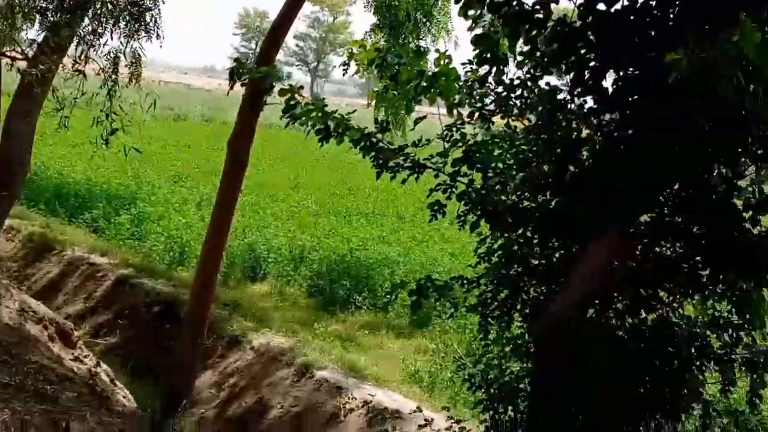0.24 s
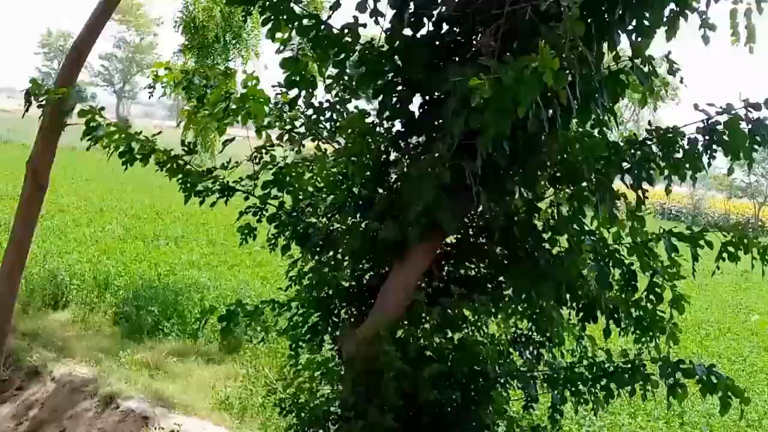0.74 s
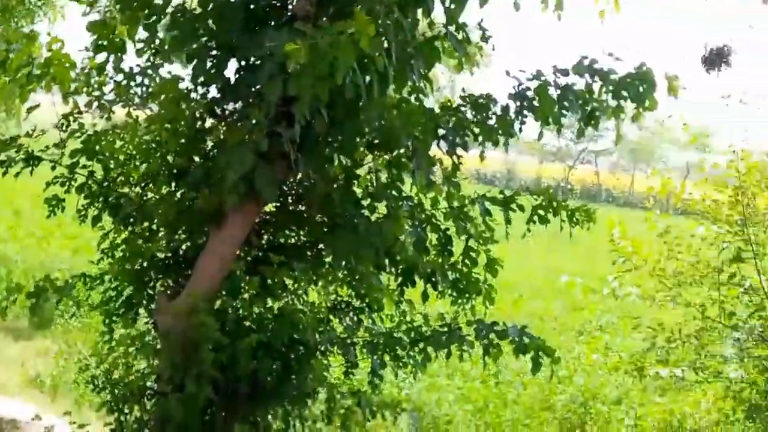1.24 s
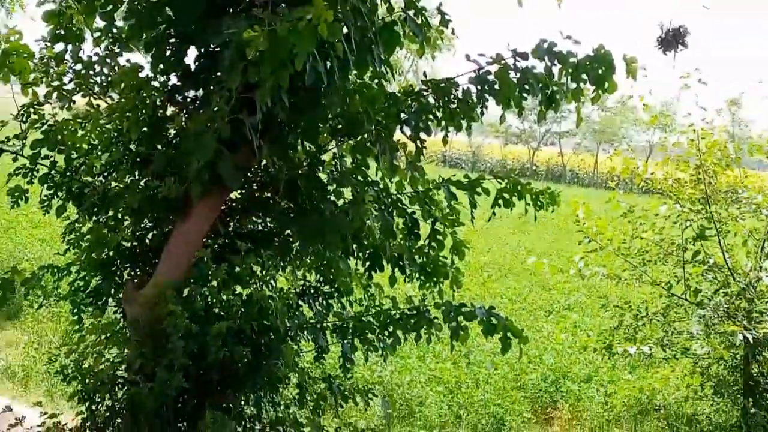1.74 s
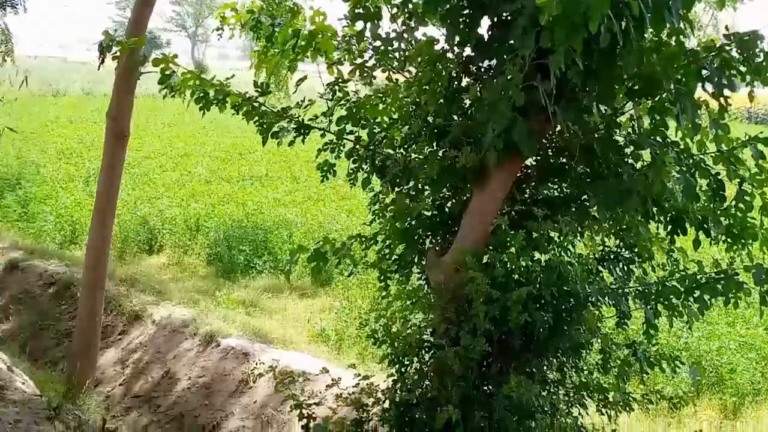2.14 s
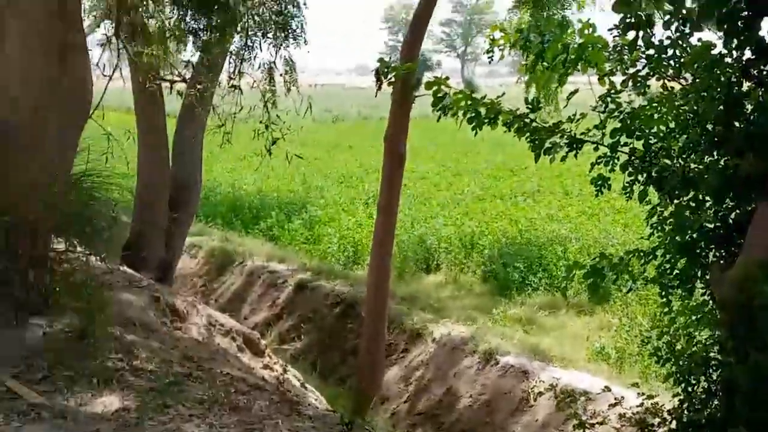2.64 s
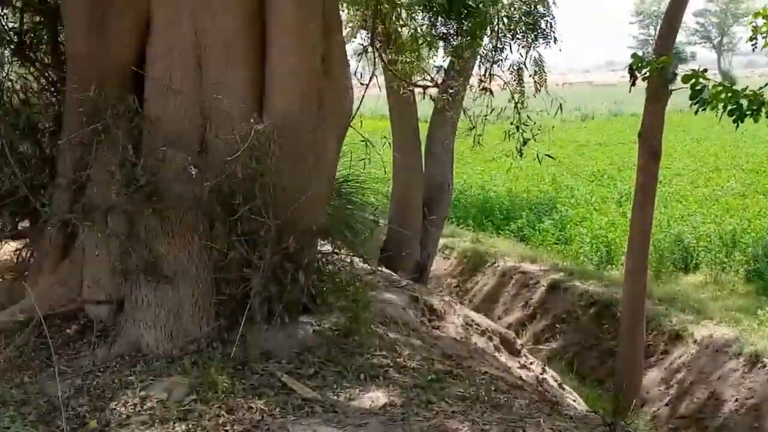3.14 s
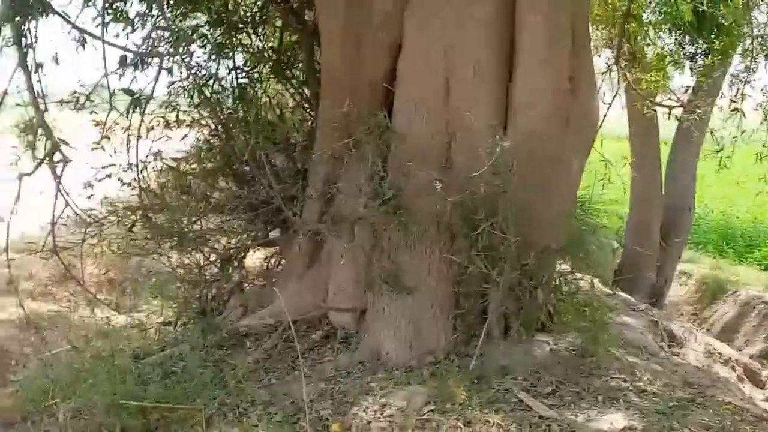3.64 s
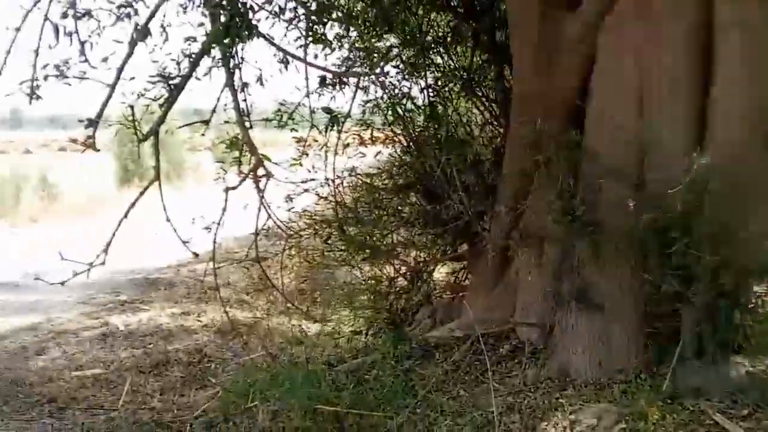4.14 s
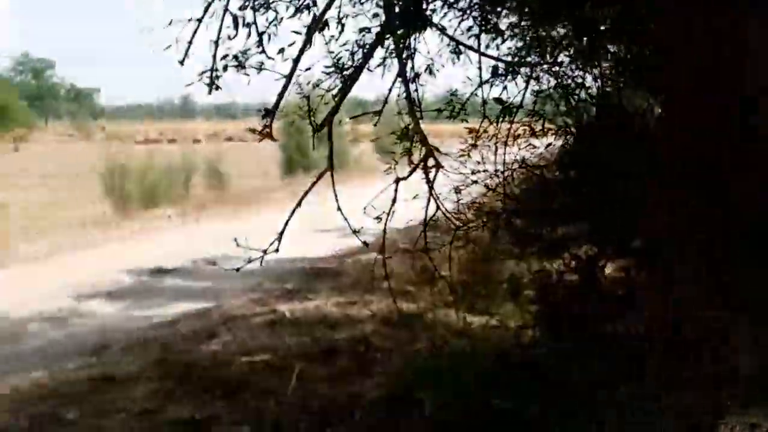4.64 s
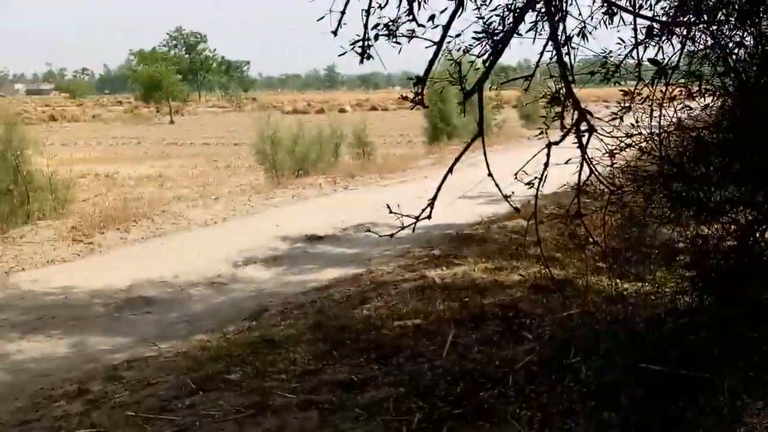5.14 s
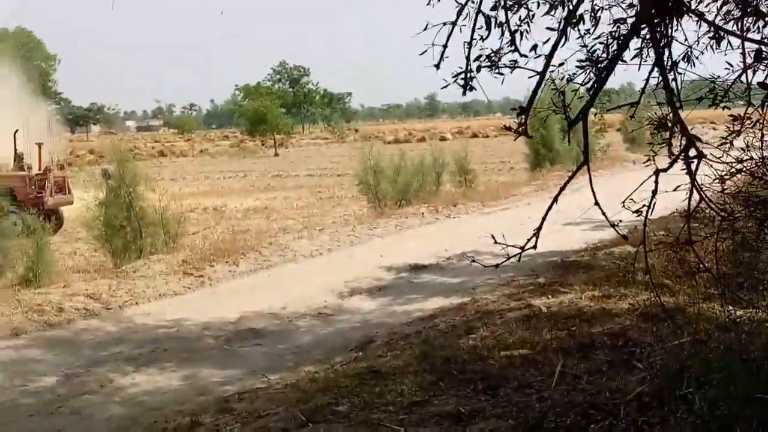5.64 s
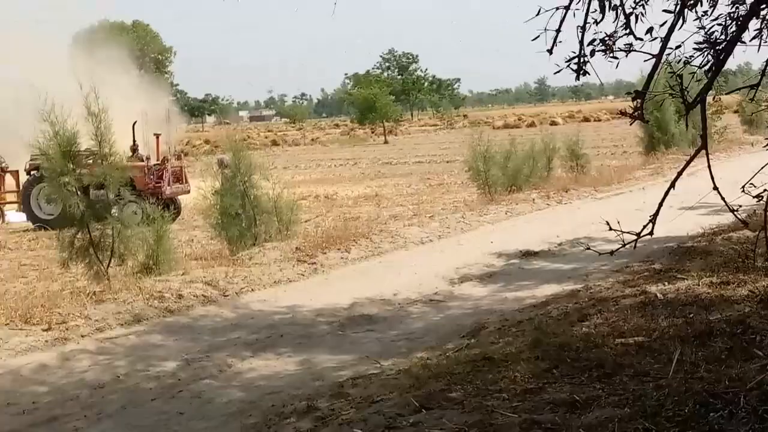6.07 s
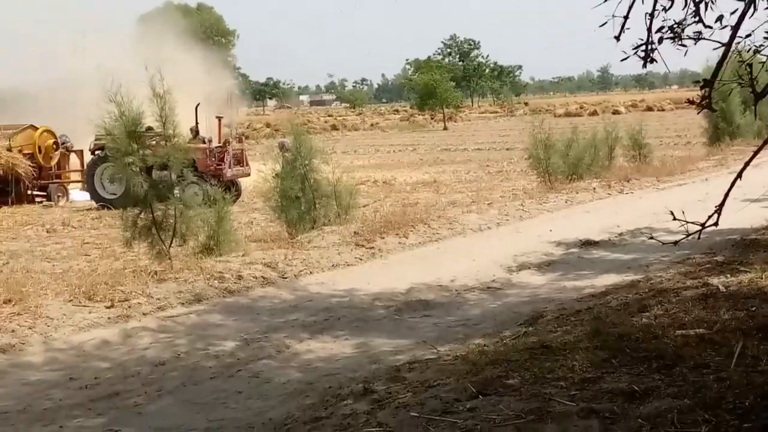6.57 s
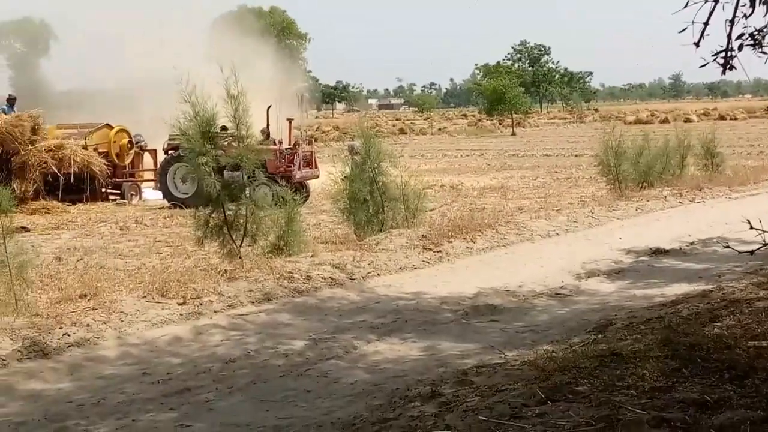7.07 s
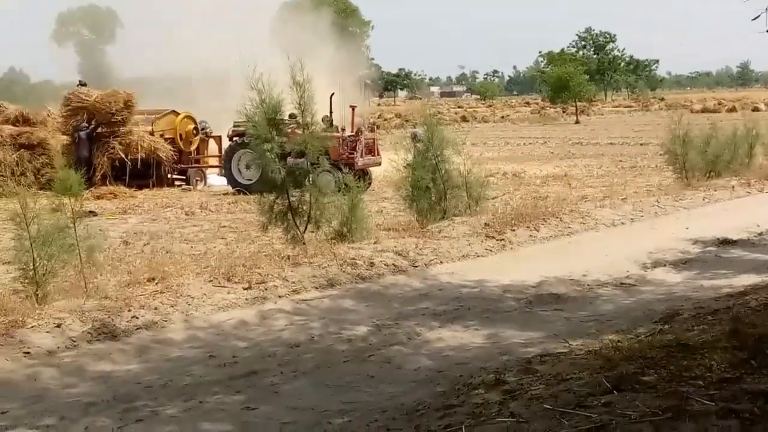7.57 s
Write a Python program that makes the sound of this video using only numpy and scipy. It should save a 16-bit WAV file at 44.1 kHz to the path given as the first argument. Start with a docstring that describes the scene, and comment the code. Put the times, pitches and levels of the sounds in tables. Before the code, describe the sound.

A diesel tractor drones and knocks steadily, driving a threshing machine with a rushing hiss, while small birds chirp faintly.

```python
"""Tractor and thresher in a field

A three-cylinder diesel tractor drives a wheat thresher by belt, heard across a field from a hand-held
phone. The exhaust drones and each firing knocks. The thresher's drum beats a little faster than the
engine fires, so the drone throbs. A blower hums, straw and chaff rush, and small birds call in the
trees. The phone turns, which changes the tone colour, and the highest hiss rises and falls."""
import sys
import numpy as np
from scipy import signal
from scipy.fft import next_fast_len
from scipy.io import wavfile
from scipy.ndimage import uniform_filter1d

SR = 44100
rng = np.random.default_rng(int(sys.argv[2]) if len(sys.argv) > 2 else 0)


def file_out(sig):
    """Save sig as 16-bit WAV at sys.argv[1]."""
    # one column per channel
    cols = np.atleast_2d(sig).T
    # limit, then scale
    lim = np.clip(cols, -1, 1)
    pcm = np.round(lim * 32767).astype(np.int16)
    wavfile.write(sys.argv[1], SR, pcm)


N = 344421

# Where the phone points, from -1 (away from the machine) to 1 (towards it): time_s, facing
PHONE_FACING = [(0, -0.98), (1.7, -0.96), (2.3, -0.38), (3.1, 0.61), (3.5, 0.089), (4.5, 0.51), (5.5, 0.32),
                (6.5, .8), (7.4, 0.77), (7.8, .3)]
# The upper middle pitches rise and fall: time_s, change_db
UPPER_MIDDLE = [(0, 0.9), (.5, 0.8), (1, 1.5), (1.7, 1.5), (1.85, -0.6), (2.3, -2.5), (3.1, -2), (4, 0),
                (5, 1.2), (5.5, 1.3), (6.5, 0.9), (7, 0.7), (7.4, 0.7), (7.8, 0)]
# The highest hiss rises and falls: time_s, change_db
HIGH_HISS = [(0, 8), (1, 2), (1.7, -1), (1.849, 4), (3.6, 4.5), (4.5, 0), (5.5, -5.5), (6, -4.5),
             (7.4, -11), (7.8, -6.5)]
# How much each pitch follows those three tables: pitch_hz, facing_db, upper_middle_share, hiss_share
PITCH_FOLLOWS = [(111, 0, 0.1, 0), (171, -2, 0.26, 0.0062), (250, 2, 0.066, 0.067), (370, -2, 0.37, 0),
                 (750, -2.9, .3, 0), (1400, -2.16, 1.18, 0), (2600, 0, 1.23, 0), (3600, -0.9, 1.23, 0.009),
                 (5000, 1.5, 1.4, 0.029), (5700, 3.5, 2.1, 0.32), (6600, .8, 1.6, .3),
                 (7300, -0.8, .4, 0.55), (7900, -1, -0.55, 1)]
# Which side the rush, knock and birds lean to: time_s, left_minus_right_db
BALANCE = [(0, -.65), (1.4, -.65), (2.1, -.25), (4, -.4), (4.7, -.7), (7.8, -.2)]

# Engine speed under a changing load: time_s, firing_rate_hz
ENGINE_SPEED = [(0, 42.27), (.5, 42.26), (1, 42.37), (1.4, 41.98), (1.75, 42.51), (2.1, 43.52),
                (2.5, 43.71), (2.9, 44.4), (3.5, 44.49), (4, 43.74), (4.5, 44.), (5, 43.72), (5.6, 43.22),
                (6, 43.46), (6.4, 43.74), (6.9, 44.04), (7.35, 44.76), (7.81, 44.56)]
# Pattern of strong and weak knocks, one row before 1.8 s and one after: first_db, second_db, third_db
KNOCK_PATTERN = [
    [0, 1.5, -0.051],
    [0.3, 0.3, 1.6],
]
# Firings that stand out as hard or weak: time_s, strength_db
ODD_FIRINGS = [(.151, 4.5), (.364, 3), (.435, 5.5), (.648, -3.5), (.909, 1), (.931, 2.5), (.982, 2.5),
               (1.049, -3), (1.098, 3.5), (1.171, 3.5), (1.215, -3), (1.24, 2), (1.286, 4.6), (1.31, 0),
               (1.359, 2.5), (1.5, 2.5), (1.548, -0.5), (1.736, 2.8), (1.924, -4.5), (1.947, 3.5),
               (2.2, -3), (2.521, 3.5), (2.567, 3), (2.907, 5), (2.975, 4), (3.043, 4.5), (3.469, -3.5),
               (3.514, 5), (3.899, 0), (3.945, 2.5), (4.105, -1), (4.196, 3), (4.264, -5), (4.401, 3.5),
               (4.469, 5), (4.492, -3.5), (4.56, -4), (4.742, 4.5), (4.811, 3.5), (4.879, 3.5),
               (4.925, -3.5), (5.062, 3), (5.085, 4.5), (5.154, 3.5), (5.292, -2), (5.384, 3), (5.615, -1),
               (5.661, -2.5), (5.707, 2.5), (5.892, 2), (5.915, 2.5), (5.984, 3.5), (6.236, -0.5),
               (6.259, 4), (6.305, -2), (6.328, 4), (6.807, 2.5), (6.83, -1.5), (6.852, -2.5), (6.875, 3),
               (7.192, -4.5), (7.281, 3.8), (7.348, -3), (7.371, 2.5), (7.416, 2), (7.438, 2), (7.505, -4),
               (7.55, 2.5), (7.684, 3)]
# Exhaust tones; thirds come from the whole three-cylinder cycle: times_firing_rate, level_db
EXHAUST_TONES = [(0.96, -52.5), (2, -36.5), (7 / 3, -49.5), (3, -38), (10 / 3, -55.5), (4, -50.5),
                 (14 / 3, -55), (5, -53.5), (17 / 3, -52), (6, -55.5), (20 / 3, -58), (23 / 3, -61.5),
                 (14, -63.5), (26, -67)]
# Brief early swells of one engine tone: time_s, boost_db
ENGINE_SWELLS = [(.12, 9), (.42, 4), (.85, 7), (1.24, 8), (1.66, 8.5)]
# The belt slips with the load: time_s, drum_beats_per_firing
BELT_RATIO = [(0, 1.0133), (.7, 1.02), (1.4, 1.0199), (2.1, 1.0261), (3.5, 1.0249), (4.2, 1.0233),
              (5.6, 1.0233), (6.3, 1.0214), (7, 1.028), (7.81, 1.0154)]
# Tones of the thresher's drum: times_beat_rate, level_db
DRUM_TONES = [(1, -61), (2, -40), (4, -55.5), (6, -50)]
# The drum's third tone shifts as it comes to arrive by another path: time_s, level_db, lead_cycles
DRUM_THIRD_TONE = [(0, -48, .53), (1.4, -47, .5), (1.9, -45, .25), (2.4, -45, .12), (7.8, -45, .08)]
# The blower's upper tone: times_blade_rate, level_db
BLOWER_HIGH_TONE = [(2, -47.5)]
# The blower's lowest tone swells and sinks: time_s, gain_db
BLOWER_LOW_TONE = [(0, -43.5), (1.7, -45.5), (2, -44), (2.3, -52), (2.5, -47), (2.7, -51), (4, -46),
                   (5.6, -44.5), (5.8, -48.5), (7.4, -46), (7.6, -56), (7.75, -41)]

# Engine block panels rung by each firing: pitch_hz, width_hz, gain_db
ENGINE_PANELS = [(504, 396, -8), (1046, 530, -2), (1478, 175, 3), (1920, 504, 1), (2360, 282, 3),
                 (2718, 302, 4.5), (3188, 395, 3.5), (3746, 460, 3), (4356, 500, 3), (4933, 524, 1.5),
                 (5486, 355, 3.5), (6440, 1400, -2), (7640, 2640, -2.5)]
# Tone colour of the rush and knock together: pitch_hz, gain_db
RUSH_COLOUR = [(35, -31), (60, -8), (110, 3.3), (155, 3), (200, -0.5), (255, 1.44), (380, -4), (550, -9),
               (720, -13.5), (1000, -13.5), (1500, -13.5), (2000, -8.5), (2550, -7.5), (3150, -12),
               (4500, -12.5), (6200, -19), (7200, -25.5), (8000, -34.5), (8500, -49.5)]
# A broad metallic ring that drifts as the phone turns: time_s, pitch_hz
METAL_RING = [(0, 2750), (1.7, 2700), (2.3, 2610), (4.4, 2610), (5.5, 2490), (6.5, 2420), (7.8, 2400)]
# Pitches the thresher's sheet-metal housing boosts: pitch_hz, boost_db, width_share
HOUSING_PEAKS = [(255, 2.3, .1), (345, 1.5, .05), (420, 1.5, .03), (550, 1.5, .04), (990, 1, .04),
                 (1320, .5, .04), (1490, 3, .025)]
# The lower treble rises and falls: time_s, change_db
LOW_TREBLE = [(0, .5), (.6, 1.2), (1.1, 0), (1.8, 1.5), (2.6, -.3), (3.6, 1), (4.4, 0), (5.1, 1.5),
              (5.8, -.5), (6.1, .5), (6.8, .3), (7.1, -2), (7.6, -1.5)]
# Echoes off ground and trunks cancel one wandering pitch: time_s, pitch_hz, depth_db
MOVING_DIP = [(0, 1440, 9.5), (1, 1540, 5), (1.7, 1536, 5), (2.4, 1405, 1.5), (3.4, 1240, 9.5),
              (4.3, 1183, 3.5), (6.2, 1166, 10.5), (7.8, 1120, 8.5)]
# They also cancel some steady pitches: pitch_hz, depth_db, width_share
ECHO_DIPS = [(188, 3, .04), (312, 2.5, .03), (396, 4, .015), (512, 2.5, .03), (715, 7, .055),
             (885, 5, .035), (1900, 2.6, .06)]
# Scattered sound, which differs between the phone's two microphones: pitch_hz, gain_db
SCATTER_COLOUR = [(60, -22), (100, -32), (180, -36), (310, -30), (530, -17.5), (920, -15.5), (1600, -18),
                  (2760, -18.5), (4760, -18), (8230, -8)]

# A bird's two-note song: start_s, low_note_db, high_note_db
BIRD_SONG = [(.122, -39, -35), (.34, -38, -36), (.555, -38.5, -38), (.77, -36, -39)]
# Short twitters: start_s, length_s, start_hz, bend_hz, end_hz, level_db
BIRD_TWITTERS = [(.905, 0.059, 4350, 4150, 3950, -41), (3.655, .035, 4800, 4400, 3500, -41),
                 (3.81, 0.037, 3420, 3900, 5770, -41), (3.91, .045, 4480, 4330, 3500, -42),
                 (4.079, .055, 4000, 6000, 6400, -39.5), (4.15, .04, 4700, 4050, 3750, -38),
                 (4.318, .03, 3870, 4000, 4370, -42), (4.36, .02, 3750, 3500, 3200, -38),
                 (4.388, 0.02, 3500, 3600, 3750, -39.5), (4.764, .155, 3605, 4430, 4520, -38.5),
                 (4.905, .03, 4600, 4560, 4100, -40)]
# Rasping calls that jump up, then fall: start_s, length_s, top_hz, level_db, fade (below 0 it grows)
BIRD_RASPS = [(2.797, .085, 5700, -41.5, -.7), (3.093, .125, 5450, -33.5, .9)]


def gain(db):
    """Turn decibels into a number to multiply by."""
    return 10 ** (np.asarray(db) / 20)


def curves(table, times_s=np.arange(N) / SR):
    """Join a table's rows with straight lines over time, giving one curve per value column."""
    row_s, *columns = np.transpose(table)
    return [np.interp(times_s, row_s, column) for column in columns]


def wander(rate_hz, count=N):
    """A smooth random wobble, about 1 in size."""
    hold = int(SR / rate_hz)
    steps = np.repeat(rng.standard_normal(count // hold + 1), hold)
    return 1.13 * uniform_filter1d(uniform_filter1d(steps, hold), hold)[:count]


def bump(log_hz, centre_hz, width):
    """A bell-shaped hill around one pitch; its width is a share of that pitch."""
    return np.exp(-((log_hz - np.log(centre_hz)) / width) ** 2)


def across_pitch(table, log_hz):
    """Join a table's rows over pitch, giving one curve per value column."""
    row_hz, *columns = np.transpose(table)
    return [np.interp(log_hz, np.log(row_hz), column) for column in columns]


def level_drift_db(log_hz, times_s):
    """How much each pitch, including the highest hiss, grows louder or softer over time."""
    shares = across_pitch(PITCH_FOLLOWS, log_hz)
    tables = (PHONE_FACING, UPPER_MIDDLE, HIGH_HISS)
    return sum(share * curves(table, times_s)[0] for share, table in zip(shares, tables))


def hum(cycles, tones, lead, waver_db, drift):
    """Wavering tones locked to a spinning shaft; `drift` sets how strongly they follow level_drift_db."""
    mean_hz = (cycles[-1] - cycles[0]) * SR / N
    points = np.arange(0, N, 512)
    drifts_db = drift * level_drift_db(np.log([[multiple * mean_hz] for multiple, _ in tones]), points / SR)
    sound = 0
    for (multiple, db), drift_db in zip(tones, drifts_db):
        level = gain(db + drift_db + waver_db * wander(2.94)[points])
        wave = 2 ** .5 * np.cos(2 * np.pi * (multiple * cycles + lead))
        sound += np.interp(np.arange(N), points, level) * wave
    return sound


def firing_strengths(cycles):
    """Each firing's strength in dB: a repeating pattern plus chance, apart from those that stand out."""
    count, pattern_change_s = N // 100, 1.8
    early, late = (np.resize(row, count) for row in KNOCK_PATTERN)
    strength_db = np.where(np.arange(count) < cycles[int(pattern_change_s * SR)], early, late)
    strength_db += .6 * rng.standard_normal(count)
    odd_s, odd_db = np.transpose(ODD_FIRINGS)
    strength_db[np.round(cycles[(odd_s * SR).astype(int)] + .15).astype(int)] = odd_db
    return strength_db


def exhaust(cycles, strength_db):
    """Puffs of gas blend into a drone, and stronger firings push it harder."""
    push = uniform_filter1d(gain(strength_db / 3)[np.round(cycles).astype(int)], size=300)
    return push * hum(cycles - .06, EXHAUST_TONES, lead=-.19, waver_db=.93, drift=3.45)


def engine_swells(cycles):
    """One quiet engine tone that swells briefly a few times near the start."""
    swell_db = sum(db * np.exp(-((np.arange(N) / SR - time_s) / .05) ** 2) for time_s, db in ENGINE_SWELLS)
    return hum(cycles, [(26 / 3, -53.5)], lead=0, waver_db=1.5, drift=3.5) * gain(swell_db)


def thresher_drum(beats):
    """The beaters of the spinning drum hum; the third tone shifts in level and timing."""
    main = hum(beats, DRUM_TONES, lead=.25, waver_db=1.2, drift=.3)
    third_db, third_lead = curves(DRUM_THIRD_TONE)
    return main + hum(beats, [(3, 0)], lead=third_lead, waver_db=1.3, drift=0) * gain(third_db)


def blower(blade_passes):
    """Passing fan blades make two tones, an octave apart."""
    high = hum(blade_passes, BLOWER_HIGH_TONE, lead=-.19, waver_db=4.5, drift=.3)
    low = hum(blade_passes, [(1, -.88)], lead=-.19, waver_db=2, drift=0)
    return high + low * gain(curves(BLOWER_LOW_TONE)[0])


def diesel_knock(cycles, strength_db):
    """Each firing is a sharp burst that rings the engine's panels unequally and a little apart."""
    firing, progress = np.divmod(cycles + .235, 1)  # progress runs from 0 to 1 in each firing
    firing = firing.astype(int)
    bang = np.exp(-np.maximum(progress - .17, 0) / .11)
    tail = .66 * progress ** .5 * (1 - progress)
    valve_rattle = .12 * np.exp(-((progress - .58) / .068) ** 2)
    # A quarter of the clatter's power repeats on every three-cylinder cycle.
    repeating = rng.choice([-1., 1.], size=3000)[(cycles % 3 * 1000).astype(int)]
    fresh = rng.choice([-1., 1.], size=N)
    clatter = (bang + tail + valve_rattle) * (.25 ** .5 * repeating + .75 ** .5 * fresh)
    sound = 0
    for hz, width_hz, db in ENGINE_PANELS:
        level = gain(db + strength_db + rng.standard_normal(len(strength_db)))[firing]
        lag_cycles = np.abs(.022 * rng.standard_normal(len(strength_db)))[firing]
        attack = np.clip((progress - lag_cycles) / .03, .15, 1)
        panel = signal.butter(2, (hz - width_hz / 2, hz + width_hz / 2), "band", fs=SR, output="sos")
        sound += signal.sosfilt(panel, level * attack * clatter)
    return sound


def straw_rush():
    """Straw, chaff and air make a noise that flutters slightly in level."""
    return gain(1.13 * wander(9)) * rng.standard_normal(N)


def echo_dips_db(log_hz, times_s):
    """Echoes cancel narrow bands of pitch."""
    moving_hz, moving_db = curves(MOVING_DIP, times_s)
    dips = [(moving_hz, moving_db, .061), *ECHO_DIPS]
    return -sum(db * bump(log_hz, hz, width) for hz, db, width in dips)


def ringing_db(log_hz, times_s):
    """Ringing metal boosts some pitches, while the lower treble rises and falls."""
    ring = 2.7 * bump(log_hz, curves(METAL_RING, times_s)[0], width=.14)
    housing = sum(db * bump(log_hz, hz, width) for hz, db, width in HOUSING_PEAKS)
    treble = curves(LOW_TREBLE, times_s)[0] * bump(log_hz, centre_hz=5400, width=.4)
    return ring + housing + treble


def colour(noise, scattered=False):
    """Split a noise into pitches, make each louder or softer over time, and join them again."""
    hz, times_s, bands = signal.stft(noise, SR, nperseg=4096)
    log_hz = np.log(hz + 1)[:, None]
    db = across_pitch(RUSH_COLOUR, log_hz)[0] + level_drift_db(log_hz, times_s)
    db += echo_dips_db(log_hz, times_s) + ringing_db(log_hz, times_s)
    if scattered:
        db += across_pitch(SCATTER_COLOUR, log_hz)[0]
    return signal.istft(bands * gain(db), SR)[1][:N]


def rush_and_knock(cycles, strength_db):
    """The machines' noise as it arrives directly, and as leaves and trunks scatter it."""
    clear_db = .6 * curves(UPPER_MIDDLE)[0]  # the knock stands out when the upper middle is loud
    noise = gain(-clear_db) * straw_rush() + gain(6 + clear_db / 2) * diesel_knock(cycles, strength_db)
    direct = colour(noise)
    throb = uniform_filter1d(np.abs(noise), size=60)  # scattering keeps the throb, with a new fine grain
    scattered = colour(throb * rng.standard_normal(N), scattered=True)
    return gain(-30.5) / np.std(direct) * np.array([direct, scattered])


def add_chirp(track, start_s, length_s, pitches_hz, db, hoarse, bend_at=1 / 3, warble=0, fade=0):
    """Add a bird's whistle that bends through three pitches, flutters, and may warble and fade."""
    count, warble_hz = int(length_s * SR), 114.3
    progress = np.arange(count) / (length_s * SR)
    flutter = hoarse * wander(400, count) + warble * np.sin(2 * np.pi * warble_hz * length_s * progress)
    glide_hz = uniform_filter1d(np.interp(progress, (0, bend_at, 1), pitches_hz), size=300)
    whistle = 2 ** .5 * np.sin(2 * np.pi * np.cumsum(glide_hz * (1 + flutter)) / SR)
    swell = np.sin(np.pi * progress ** .66) ** .5 * np.exp(-fade * progress)
    start = int(start_s * SR)
    track[start:start + count] += gain(db + 1.5 * wander(150, count)) * swell * whistle


def birds():
    """Small birds sing, twitter and rasp in the trees, and a nearby trunk echoes them."""
    calls = np.zeros(N)
    for start_s, low_db, high_db in BIRD_SONG:
        add_chirp(calls, start_s, .05, (4500, 4620, 4720), low_db, hoarse=.009)
        add_chirp(calls, start_s + .05, .055, (5850, 6450, 6250), high_db, hoarse=.024, fade=.8)
    for start_s, length_s, *pitches_hz, db in BIRD_TWITTERS:
        add_chirp(calls, start_s, length_s, pitches_hz, db, hoarse=.02)
    for start_s, length_s, top_hz, db, fade in BIRD_RASPS:
        pitches_hz = (.86 * top_hz, top_hz, .8 * top_hz)
        add_chirp(calls, start_s, length_s, pitches_hz, db, hoarse=.015, bend_at=.13, warble=.04, fade=fade)
    return calls + .35 * np.roll(calls, int(.012 * SR))


def scene():
    """The engine drives the drum and the drum drives the blower; all is mixed to left and right."""
    firing_hz = curves(ENGINE_SPEED)[0]
    cycles = np.cumsum(firing_hz) / SR + .43  # counts up by one per firing
    beats = np.cumsum(firing_hz * curves(BELT_RATIO)[0]) / SR
    strength_db = firing_strengths(cycles)
    drone = exhaust(cycles, strength_db) + engine_swells(cycles) + thresher_drum(beats + .604)
    drone += blower(1.276 * beats + .83)  # geared to 1.276 blades per drum beat
    direct, scattered = rush_and_knock(cycles, strength_db)
    sides = np.array([[1], [-1]])  # adds on the left, takes away on the right
    # The deepest bass is a little stronger on the right, and out of step between the sides.
    bass = signal.sosfiltfilt(signal.butter(2, 85, fs=SR, output="sos"), drone)
    bass += gain(7) * np.imag(signal.hilbert(bass, next_fast_len(N))[:N])
    drone = drone - gain(-26) * sides * bass
    # The highest hiss leans right.
    hiss = signal.sosfiltfilt(signal.butter(4, 7000, "high", fs=SR, output="sos"), direct)
    direct = direct - gain(-15.5) * sides * hiss
    balance = gain(sides * curves(BALANCE)[0] / 2)
    return drone + (direct + birds()) * balance + sides * scattered


def record(dry):
    """The phone cuts the deepest bass and the highest treble."""
    lowest_hz, highest_hz = 38, 8800
    dry = signal.sosfilt(signal.butter(4, lowest_hz, "high", fs=SR, output="sos"), dry)
    return signal.sosfilt(signal.ellip(10, .2, 70, highest_hz, fs=SR, output="sos"), dry)


dry = scene()
out = record(dry)
file_out(out)
```